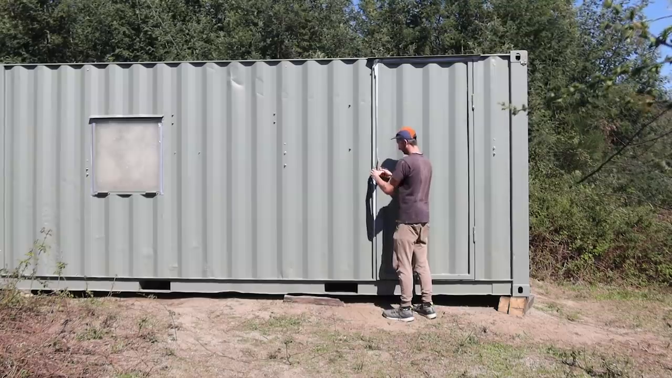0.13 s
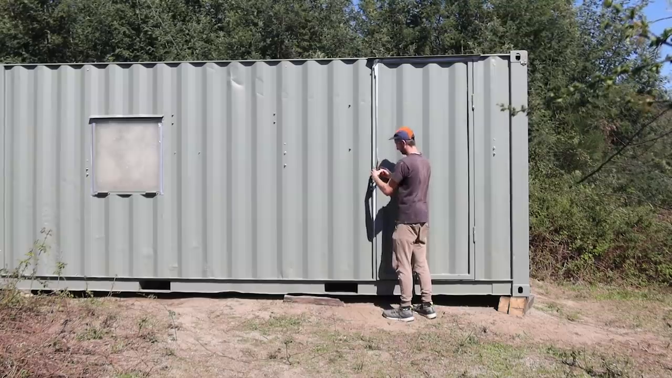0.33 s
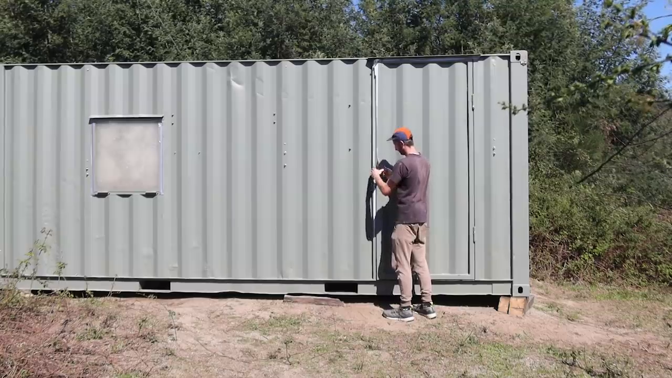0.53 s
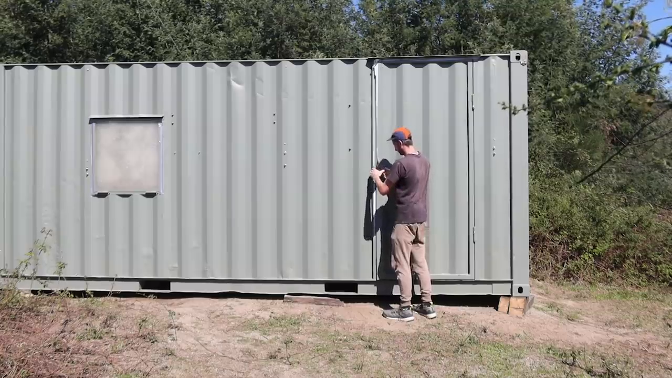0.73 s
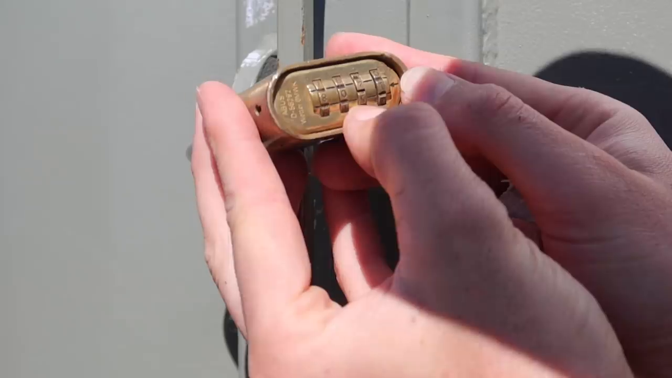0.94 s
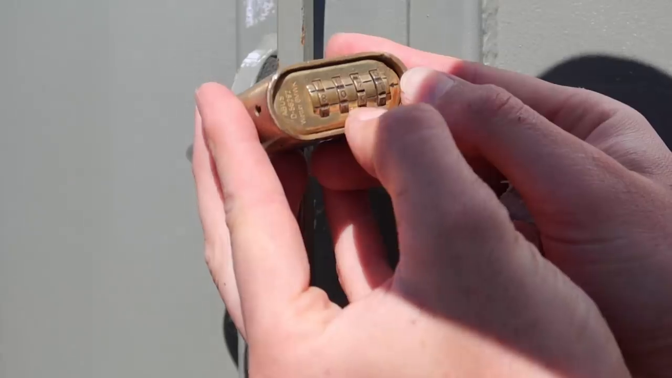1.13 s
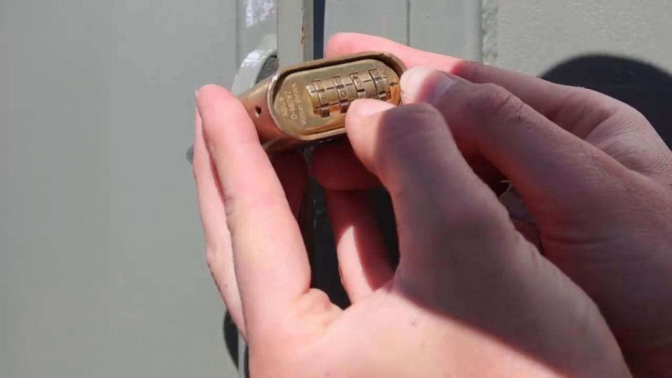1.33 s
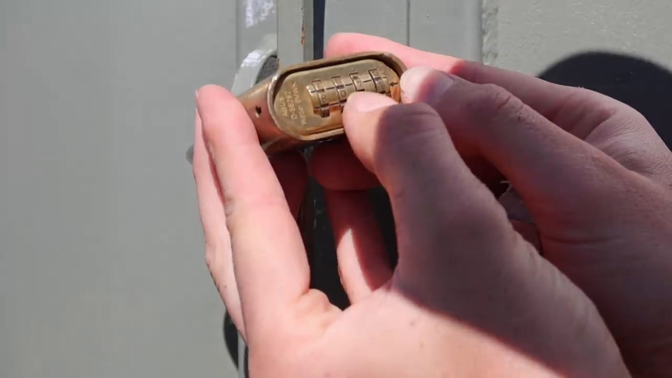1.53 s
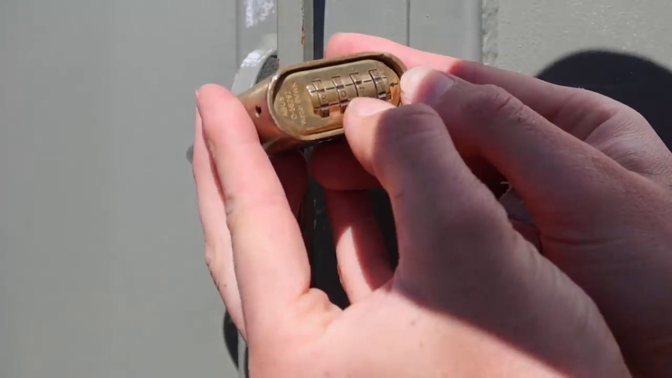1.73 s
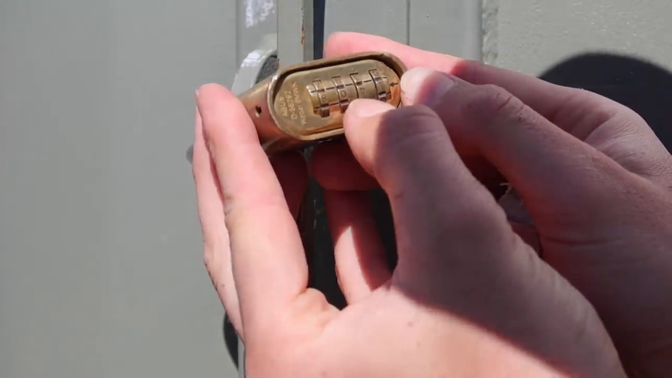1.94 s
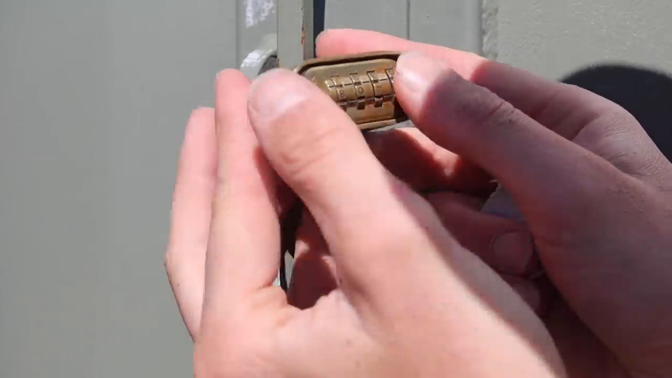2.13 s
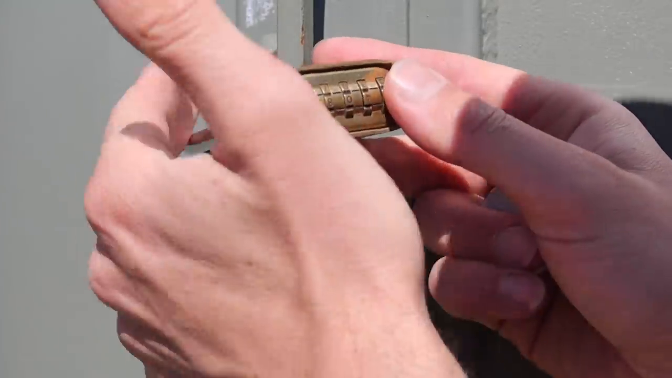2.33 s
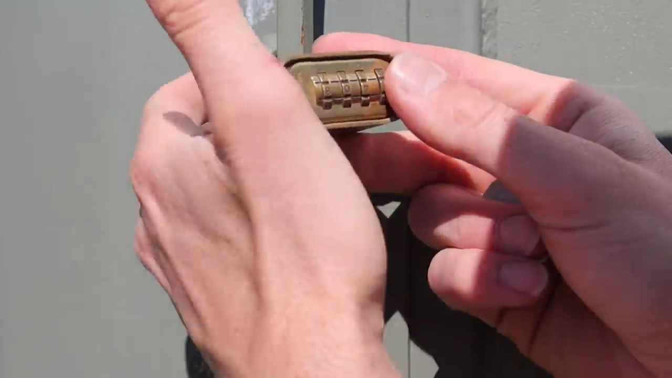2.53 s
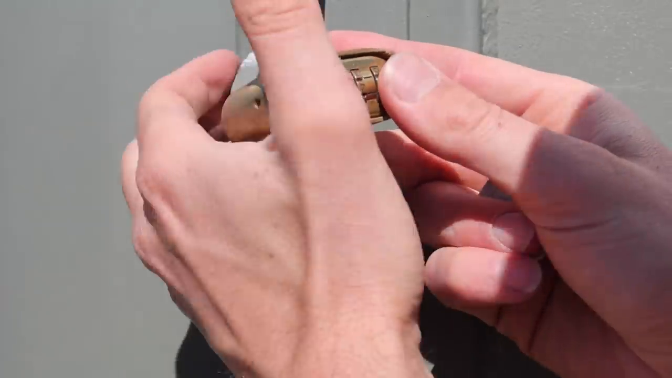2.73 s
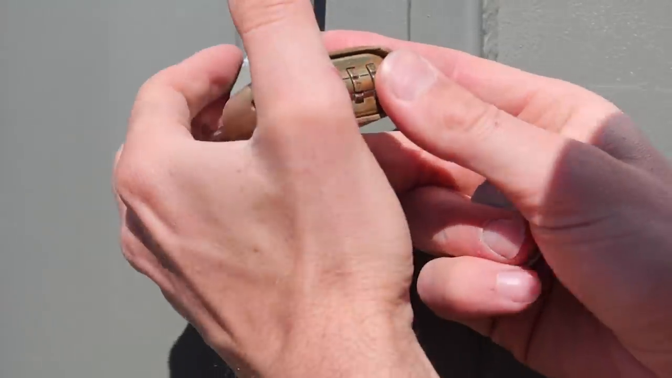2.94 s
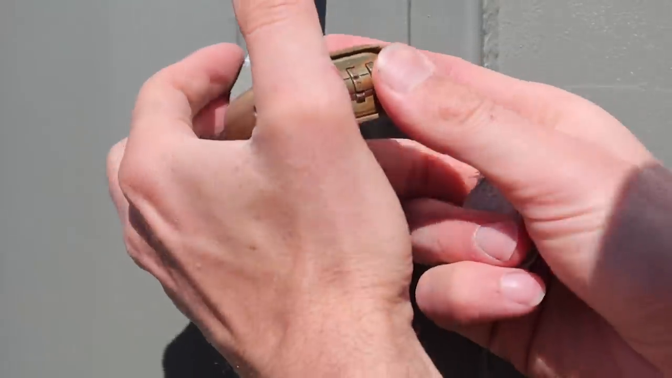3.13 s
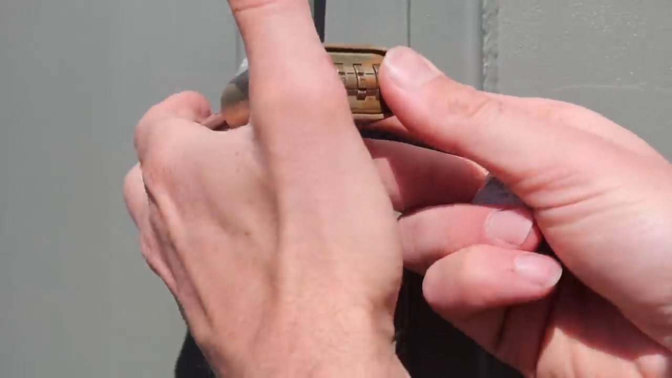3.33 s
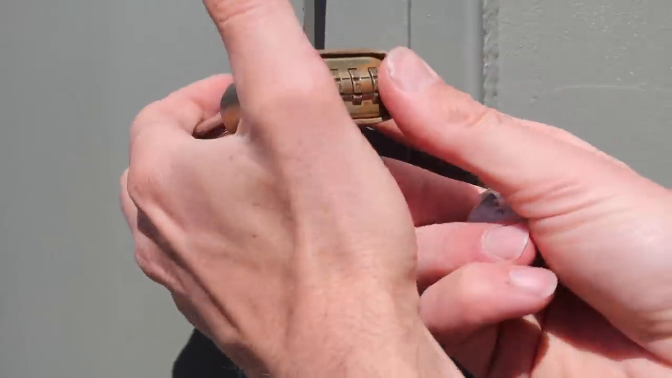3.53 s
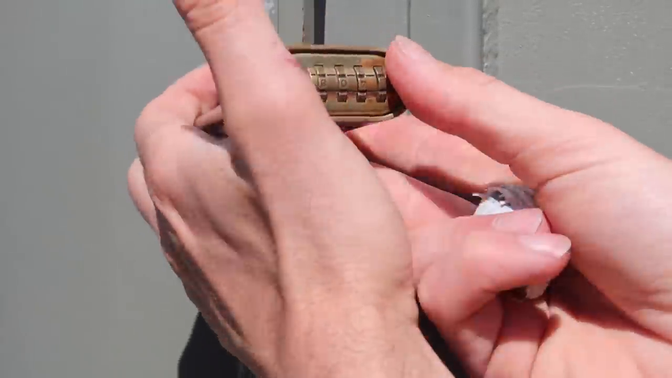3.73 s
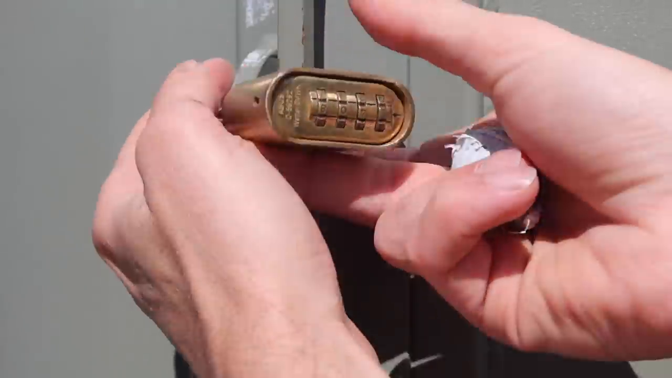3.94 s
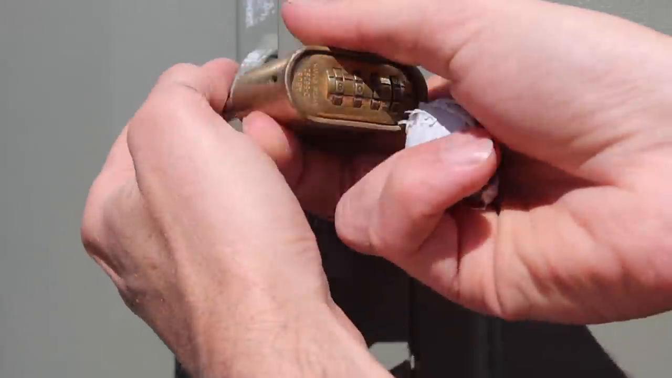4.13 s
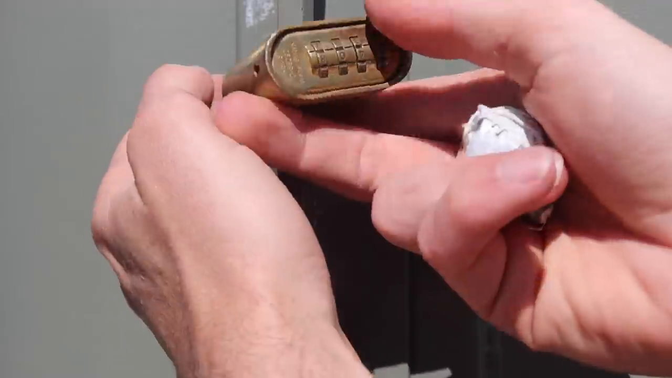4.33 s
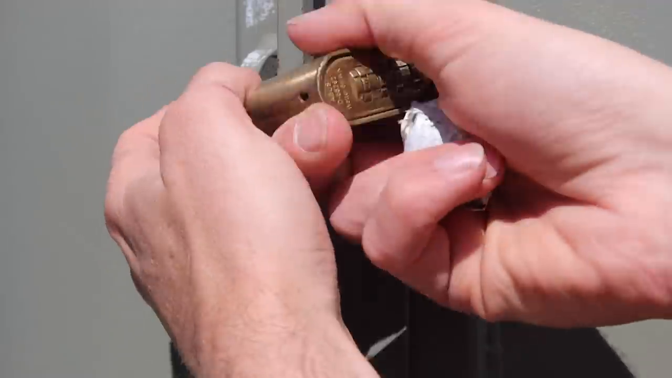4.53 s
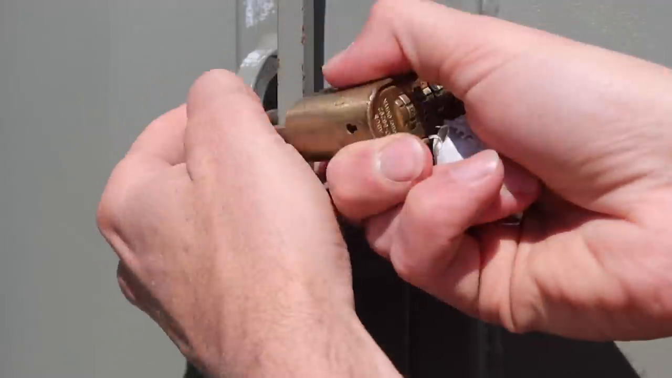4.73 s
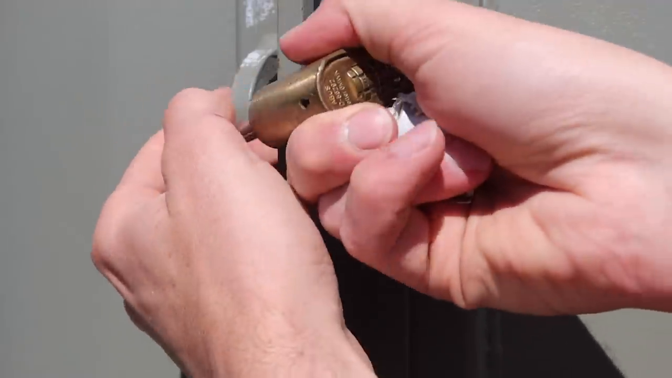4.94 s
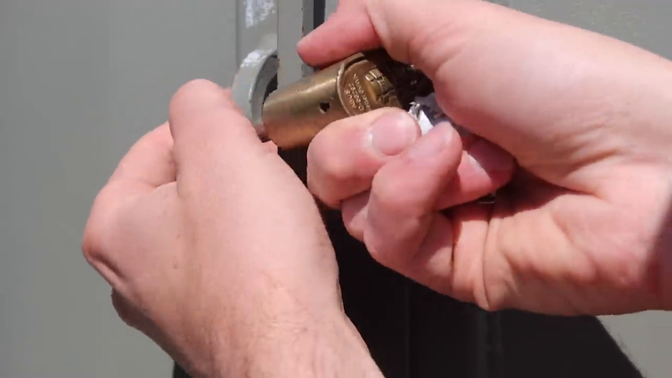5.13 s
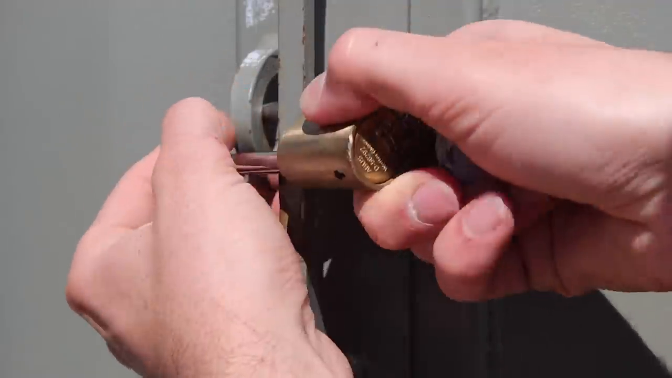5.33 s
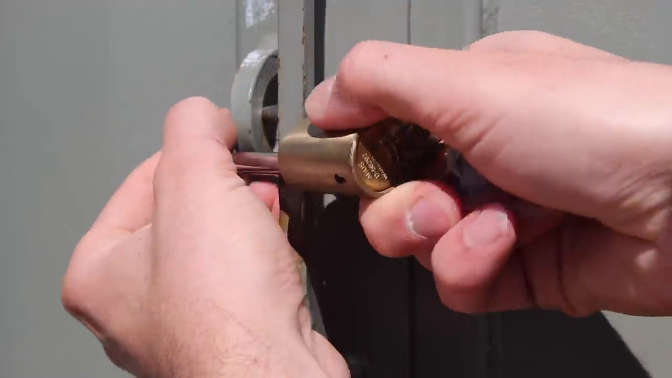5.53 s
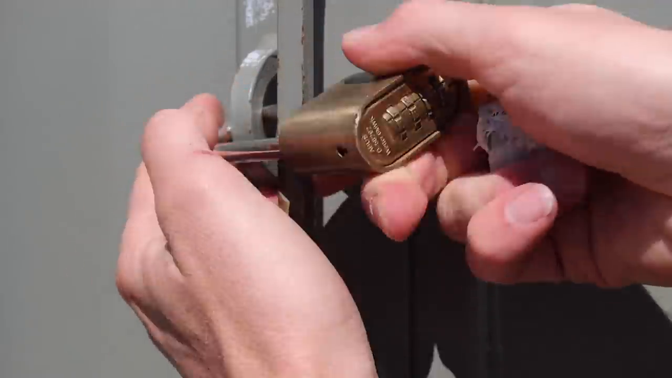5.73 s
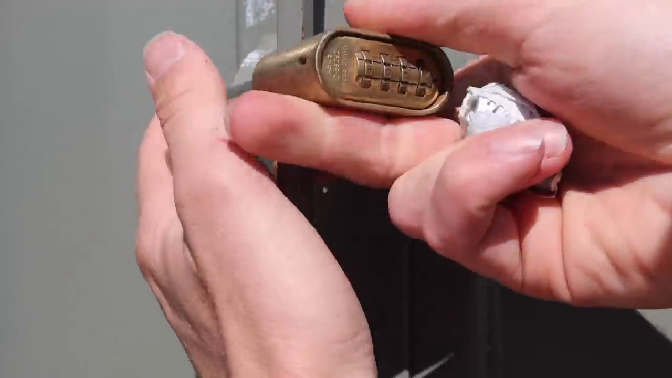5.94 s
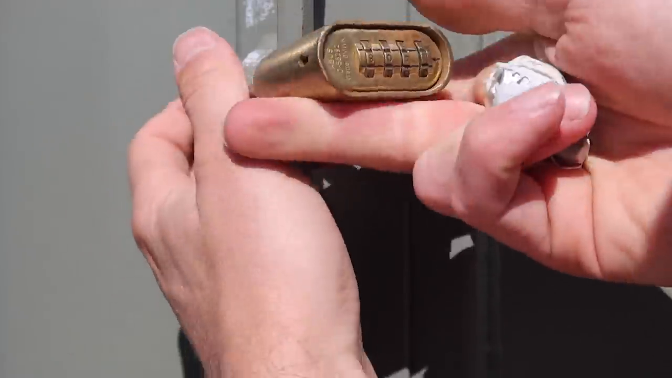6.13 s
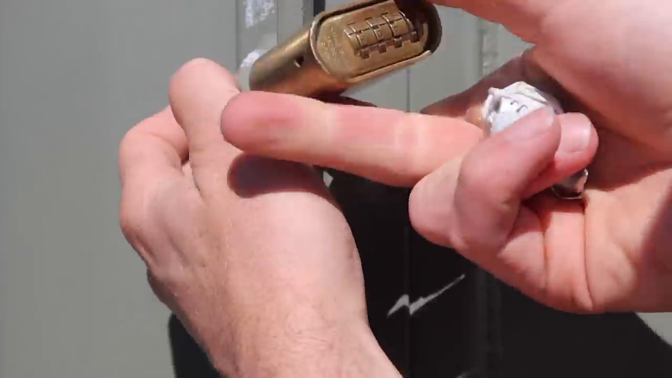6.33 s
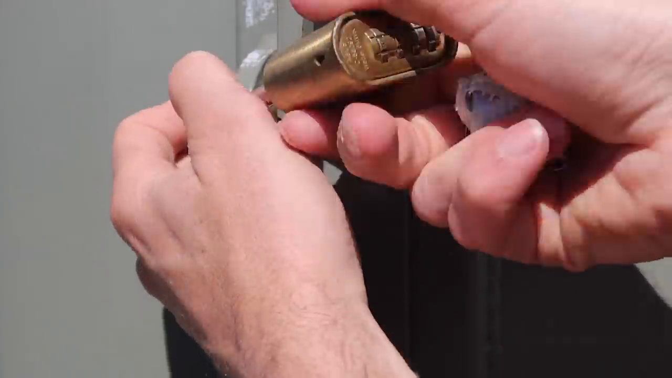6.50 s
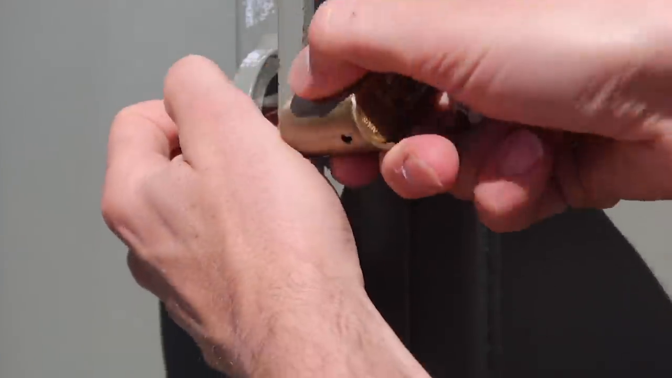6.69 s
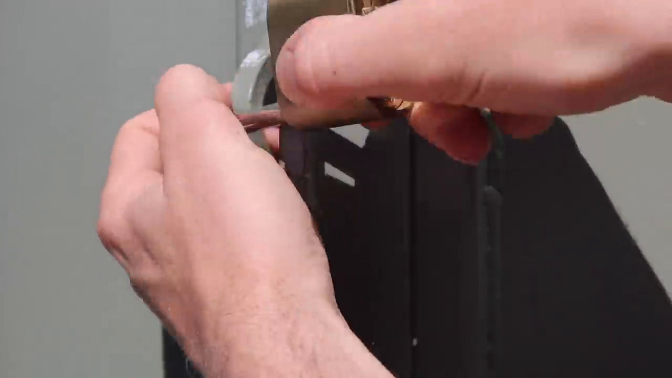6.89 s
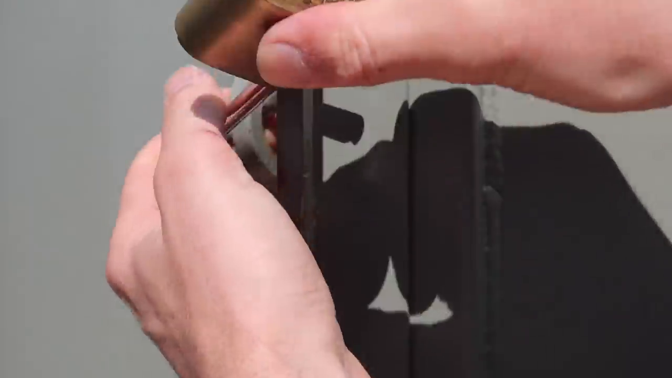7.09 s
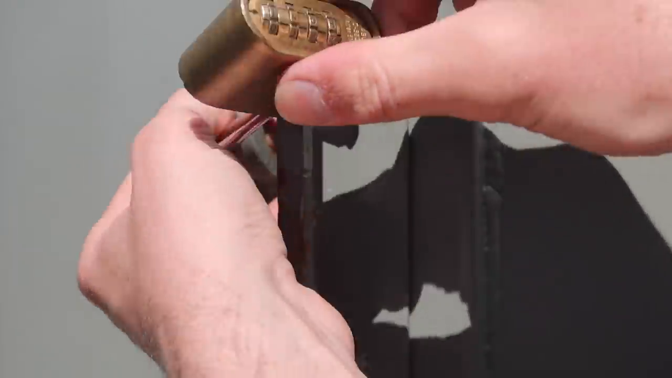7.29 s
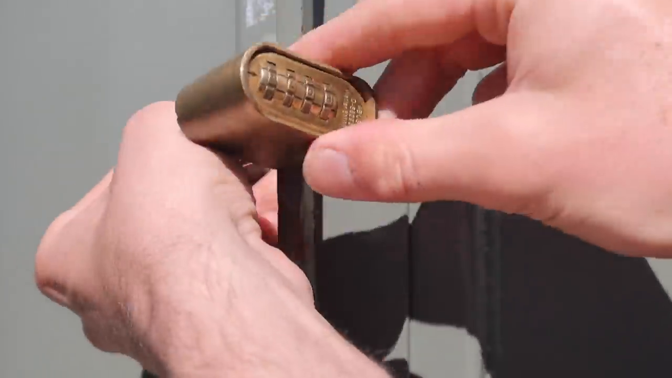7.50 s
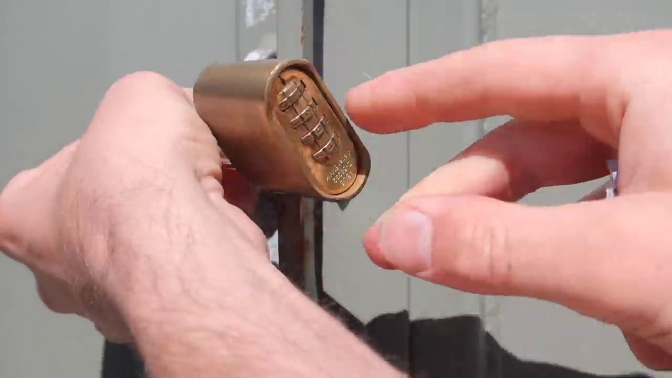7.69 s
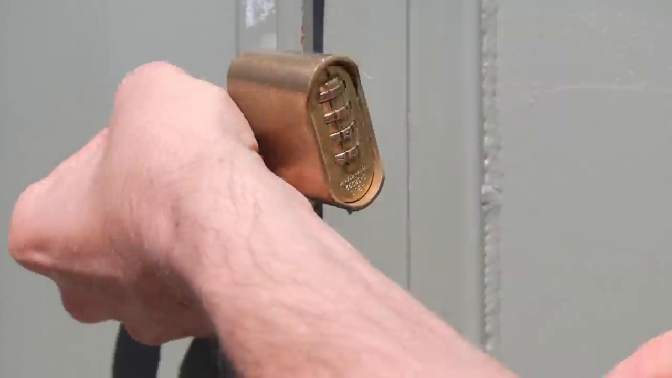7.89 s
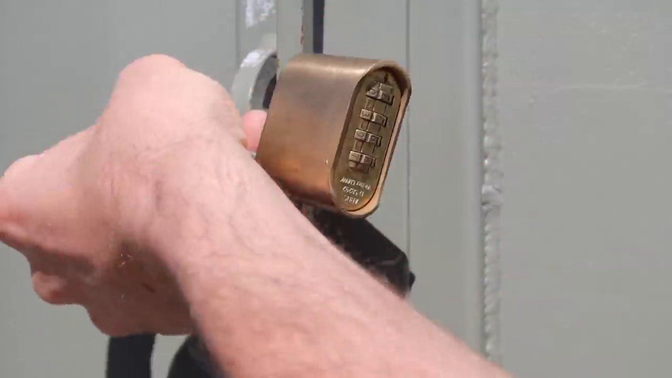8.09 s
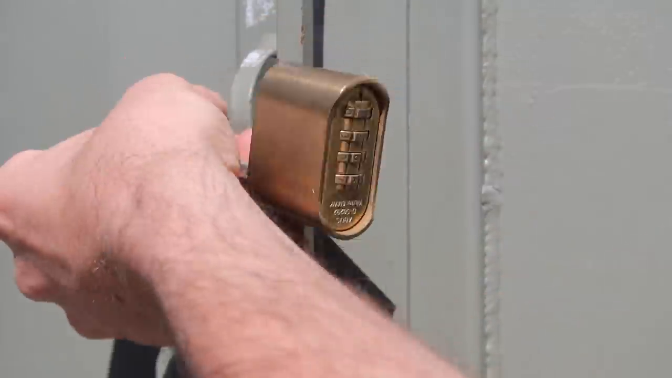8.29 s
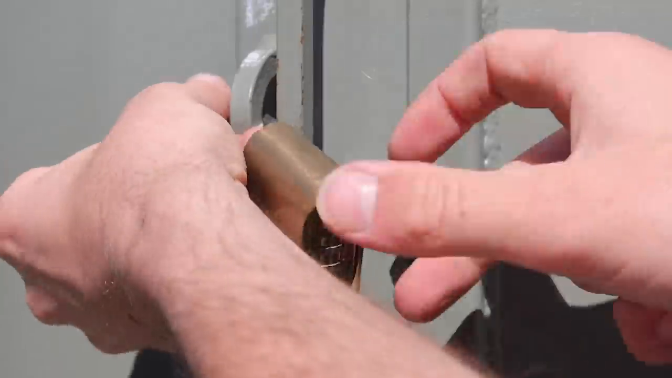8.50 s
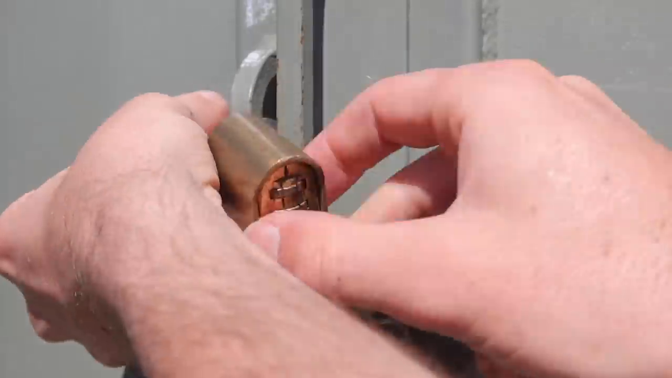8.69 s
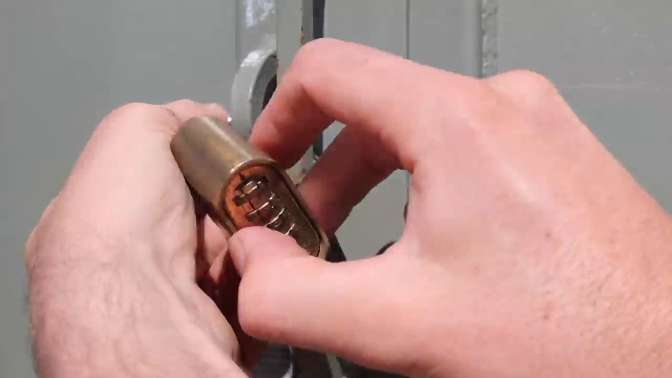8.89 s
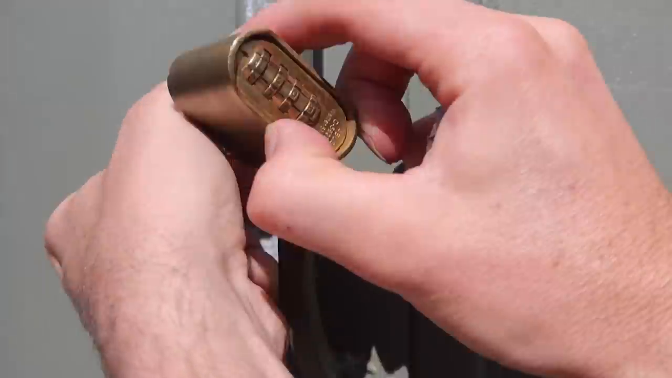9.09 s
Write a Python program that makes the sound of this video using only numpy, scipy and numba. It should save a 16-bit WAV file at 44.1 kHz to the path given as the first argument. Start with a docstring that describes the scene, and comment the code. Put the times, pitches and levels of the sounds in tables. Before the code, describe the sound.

Close outdoor stereo pickup of a padlock being freed from a large metal door. Light clicks come first, then dense clanking with bright metallic cracks, scratchy chatter, a few high shackle pings and low panel hums. Thin bird whistles sit faintly behind. After seven seconds there is a lull with skin rubbing brass, a last cluster of loud clanks, and small sounds to the end.

```python
"""Quiet outdoor air and one far-off bird call, then a brass padlock is worked out of the latch of a steel
shipping container. Each knock of lock or shackle is noise shaped into a crack and a crowded ring, with a boom
of decaying door modes; stick-slip ticks make the shackle's scrapes and the rub of fingers. Clicks are pairs of
modes, pings a few close high modes and slow hums single modes; thin bird whistles are wavering tones, the air
is filtered noise. A close stereo microphone with a limiter picks it up, the latch a little to its right."""
import sys
import numpy as np
from scipy import signal
from scipy.fft import rfft, irfft, next_fast_len
from scipy.io import wavfile
from numba import njit

SR = 44100
rng = np.random.default_rng(int(sys.argv[2]) if len(sys.argv) > 2 else 0)


def materialize(psi):
    """Save the field psi as 16-bit PCM at rate SR to the path in sys.argv[1].

    A 1-D psi becomes a single channel; in a 2-D psi each row is a channel.
    """
    bounded = np.clip(np.atleast_2d(psi).T, -1, 1)
    quanta = np.round(bounded * 32767).astype(np.int16)
    wavfile.write(sys.argv[1], SR, quanta)


N = 403515
T = np.arange(N) / SR
RISE_S = 0.0018  # time constant of the door's build-up after a blow
KNEE_HZ = 1795  # a knock's weight and clank act below this, its hardness above
TOP_HZ = 15200  # upper edge of the microphone's range


def undb(db):
    """Decibels to gain."""
    return 10 ** (np.asarray(db) / 20)


def unit(x):
    """Scale to rms 1."""
    return x / np.sqrt(np.mean(x ** 2))


def add(out, s, x):
    """Mix x into out from time s on."""
    i = max(int(s * SR), 0)
    out[i:i + len(x)] += x[:max(len(out) - i, 0)]


def colour(x, hz, db):
    """Causal filter through (Hz, dB) points, built from the cepstrum of its log gain."""
    size = 4096
    f = np.maximum(np.fft.rfftfreq(size, 1 / SR), 1)
    gain_db = np.interp(np.log(f), np.log(hz), db)
    cepstrum = irfft(np.log(undb(gain_db)))
    # folding the cepstrum onto positive times gives minimum phase
    cepstrum[1:size // 2] *= 2
    cepstrum[size // 2 + 1:] = 0
    impulse = irfft(np.exp(rfft(cepstrum)))
    return signal.oaconvolve(x, impulse)[:len(x)]


def band(x, lo_hz, hi_hz, order=3):
    """Butterworth band-pass."""
    sos = signal.butter(order, [lo_hz, hi_hz], "bandpass", fs=SR, output="sos")
    return signal.sosfilt(sos, x)


def air(air_db=-47):
    """Steady soft outdoor air: filtered noise, wide except in the deep bass, with a few puffs of wind."""
    # spectrum of the open air: (frequency [Hz], relative density [dB per Hz])
    air_spectrum = [(15, -85), (25, 1.5), (104, 4.5), (281, 2), (339, -4), (378, -2), (521, -7.5),
                    (893, -11.5), (1020, -12), (1660, -15.5), (2170, -17), (2620, -19), (4850, -23.5),
                    (13000, -39), (15400, -60)]
    # width of the open air: (frequency [Hz], side minus mid [dB])
    air_width = [(30, -12), (60, -18), (140, -6.5), (350, 1.5), (850, 1), (2000, -1.5), (5000, -3),
                 (12000, -3.5)]
    # puffs of wind on the microphone: (time [s], length [s], level [dB])
    puffs = [(0.43, 0.11, -42), (0.524, 0.18, -37.5), (5.707, 0.25, -36)]
    mid = undb(air_db) * unit(colour(rng.standard_normal(N), *np.transpose(air_spectrum)))
    side = undb(air_db) * unit(colour(rng.standard_normal(N), *np.transpose(air_spectrum)))
    side = colour(side, *np.transpose(air_width))
    for s, length_s, db in puffs:
        n = int(length_s * SR)
        rumble = unit(band(rng.standard_normal(n), 35, 99))
        add(mid, s, undb(db) * np.hanning(n) * rumble)
    return np.array([mid + side, mid - side])


def note(hz, db):
    """A bird's pure tone that swells and fades along a pitch line."""
    envelope = undb(db) * np.sqrt(2 * np.hanning(len(hz)))
    return envelope * np.sin(2 * np.pi * np.cumsum(hz) / SR)


def birds(whistle_s=0.11, glide_hz=100, waver_hz=170, echo_db=-10, echo_s=0.03):
    """Pure tones from the trees: one slurred call, later a string of thin, rising, wavering whistles."""
    # the wavy slur of the call, ending on a level pitch: (time [s], pitch [Hz], level [dB])
    warble = [(0.018, 4280, -64), (0.041, 4400, -52), (0.044, 3400, -60), (0.047, 3920, -49),
              (0.059, 3370, -47), (0.069, 4060, -47), (0.08, 3680, -51), (0.09, 3880, -48),
              (0.095, 4370, -57), (0.112, 4350, -50), (0.128, 4350, -68)]
    # thin high whistles: (time [s], pitch at mid-note [Hz] before waver, level [dB])
    whistles = [(5.16, 7250, -69), (5.42, 7200, -67), (5.71, 7200, -59), (5.92, 7440, -59),
                (6.127, 7600, -62), (6.32, 7340, -70), (7.385, 6800, -64)]
    times, pitch, level = np.transpose(warble)
    slur = np.sin(2 * np.pi * np.cumsum(np.interp(T, times, pitch)) / SR)
    out = np.interp(T, times, undb(level), left=0, right=0) * slur
    # a low soft note opens the call: 3280 Hz for 20 ms
    add(out, 0.02, note(np.full(int(0.02 * SR), 3280), -58))
    n = int(whistle_s * SR)
    glide = glide_hz * np.linspace(-.5, .5, n)
    for s, hz, db in whistles:
        waver = waver_hz * unit(band(rng.standard_normal(SR), 27, 110))[-n:]
        add(out, s, note(hz + glide + waver, db))
    # trunks and leaves blur the calls a little
    t = T[:SR // 5]
    trees = rng.standard_normal(len(t)) * np.exp(-t / echo_s)
    return out + undb(echo_db) * signal.oaconvolve(out, trees / np.linalg.norm(trees))[:N]


def ringing(modes, t, spot_db, grip_share=0.0347):
    """Decaying modes; the struck spot decides how strongly each answers, and the grip pulls its pitch."""
    out = np.zeros(len(t))
    for hz, db, t60 in modes:
        alive = t[t < t60]
        size = undb(db + spot_db * np.clip(rng.standard_normal(), -2, 1))
        pulled_hz = hz * (1 + grip_share * min(hz / 1000, 1) * rng.standard_normal())
        decay = np.exp(-np.log(1000) * alive / t60)
        out[:len(alive)] += size * decay * np.sin(2 * np.pi * (pulled_hz * alive + rng.random()))
    return out


def door_responses(count=16, same_share=0.12, spot_db=4, patchy_db=2.5, door_db=-6, lock_db=-3,
                   crack_rise_s=0.0014, crack_s=0.015):
    """The answer to a blow at several spots of the latch: a crack, a crowded ring and a boom for each."""
    # modes of the steel door: (nominal pitch [Hz], relative level [dB], t60 [s])
    door_modes = [(35.3, -30, 8.1), (58.9, -27, 2), (91.5, -14, 1.68), (109.7, -22, 3.7), (155.7, -38, 1),
                  (190, -13.5, 1.29), (236, -11.5, 1.22), (288, -10.5, 1.17), (325, -37, 0.17),
                  (339, -23.5, 2), (402, -17.5, 1.8), (468, -6, 0.55), (521, -12, 0.71), (627, -25.5, 0.66),
                  (696, -21.5, 0.88), (758, -32.5, 1), (805, -9.5, 0.49), (944, -10, 0.39),
                  (1107, -9.5, 0.26), (1238, -20, 0.72), (1790, -18, 0.3), (1878, -9.5, 0.22),
                  (1710, -7.5, 0.27), (1802, -1, 0.07), (1905, -11, 0.3)]
    # short bright modes of brass body and shackle: (nominal pitch [Hz], relative level [dB], t60 [s])
    lock_modes = [(1356, -23, 0.11), (2787, -9.5, 0.051), (2980, -21, 0.16), (4220, -11, 0.059),
                  (4760, -17.5, 0.1), (5740, -18, 0.031), (6240, -27.5, 0.036), (8100, -21.5, 0.021),
                  (8500, -25.5, 0.04), (9270, -28, 0.027), (10250, -27.5, 0.051), (11540, -29, 0.03)]
    # crowd of overlapping panel modes:
    # (frequency [Hz], relative density [dB per Hz], share that rings on [dB], t60 [s])
    panel = [(85.3, -13.5, 5.5, 0.56), (198, 3, -5.5, 1), (473, 8, -9, 0.76), (920, 3.5, -9, 0.42),
             (990, -9.5, -3, 0.63), (1707, -1, -4.5, 0.42), (2220, -9, -2, 0.37), (3730, -10, -9.5, 0.32),
             (5000, -16, -19, 0.33), (6340, -19.5, -16, 0.077), (10700, -39, -36, 0.033),
             (15000, -84, -26, .08)]
    t = np.arange(next_fast_len(int(1.2 * SR), real=True)) / SR
    hz, db, ring_db, t60 = np.transpose(panel)
    log_f = np.log(np.maximum(np.fft.rfftfreq(len(t), 1 / SR), 1))
    bass_cut = 1 + (hz[0] / 2 / np.exp(log_f)) ** 2
    spectrum = undb(np.interp(log_f, np.log(hz), db)) / bass_cut
    # overlapping frequency slices, each with its own decay
    slices = np.array([np.interp(log_f, np.log(hz), row) for row in np.eye(len(hz))])
    fades = undb(ring_db[:, None] - 60 * t / t60[:, None])
    patches = np.linspace(np.log(200), np.log(15000), 50)
    # bending waves take a few milliseconds to spread over the sheet
    rise, snap = 1 - np.exp(-t / RISE_S), 1 - np.exp(-t / crack_rise_s)
    end_fade = np.minimum(10 * (1 - t / t[-1]), 1)
    common, answers = rng.standard_normal(len(t)), []
    for _ in range(count):
        own = rng.standard_normal(len(t))
        noise = rfft(np.sqrt(same_share) * common + np.sqrt(1 - same_share) * own) * spectrum
        # each spot favours its own groups of modes
        noise *= undb(patchy_db * np.interp(log_f, patches, rng.standard_normal(len(patches))))
        noise /= np.std(irfft(noise))
        crack = irfft(noise, len(t)) * np.exp(-t / crack_s)
        brief = SR // 5
        crack[:brief] += undb(lock_db) * ringing(lock_modes, t[:brief], spot_db)
        ring = (irfft(noise * slices, len(t)) * fades).sum(axis=0)
        boom = undb(door_db) * ringing(door_modes, t, spot_db) * end_fade
        answers.append(np.array([snap * crack, rise * ring, rise * boom]))
    return answers


def tick(db, tick_s=0.0025):
    """The first touch of metal on metal: a very short glint."""
    t = T[:SR // 50]
    hiss = unit(colour(rng.standard_normal(len(t)), [2000, 7000, 15000], [-20, 0, -7]))
    return undb(db) * np.exp(-t / tick_s) * hiss


def swell(hz, db, t60_s, rise_s):
    """One mode that builds up and dies away."""
    t = T[:SR * 2 // 3]
    envelope = (1 - np.exp(-t / rise_s)) * np.exp(-np.log(1000) * t / t60_s)
    return undb(db) * envelope * np.sin(2 * np.pi * hz * t)


def door_note(hz, db, t60_s=0.72, slope=0.63):
    """A door mode that stands out in one knock; high ones die sooner (t60_s holds at 100 Hz)."""
    return swell(hz, db, t60_s * (hz / 100) ** -slope, RISE_S)


def metal_note(hz, db, t60_s=0.13, slope=0.46, partner_ratio=1.2, partner_db=-6, rise_s=0.0006,
               paired_from_hz=1500):
    """The latch rings; its higher modes come in pairs that beat roughly (t60_s holds at KNEE_HZ)."""
    life_s = t60_s * (hz / KNEE_HZ) ** -slope
    out = swell(hz, db, life_s, rise_s)
    if hz > paired_from_hz:
        out += swell(hz * partner_ratio, db + partner_db, life_s, rise_s)
    return out


def knocks(answers, attack_s=0.029, settle_s=1.0, tick_db=-21, deep_share=0.85,
           bounce_s=0.004, bounce_db=-5, count=2, glint_db=-5):
    """Heavy blows push low door modes, hard metal adds treble; each knock has its door and metal note."""
    # knocks of lock and shackle on the latch: (time [s], rms level over attack_s [dB],
    # weight of the push into the door [dB], hollow clank of the hasp [dB],
    # hardness of the contact as treble slope [dB per octave], ring-on at the start [dB],
    # door note [Hz], its level re the knock [dB], metal note [Hz], its level re the knock [dB])
    knock_table = [(0.196, -35, 12, 0, 5, -1, 643, -4, 5570, -11),
                   (0.925, -39.5, 3, -14, -10, -5, 288, 5, 2140, -8),
                   (1.343, -50, 9, -4, -10, -13, 212, -2, 1707, -10),
                   (1.842, -42.5, -4.5, -13, -12.5, -13, 204.5, 4.5, 1670, -1),
                   (2.088, -42, 15, 2, -8, -8, 538, 5, 1690, -12),
                   (2.256, -22, 7, 5.5, -13, -3.5, 756, -9, 1855, -10),
                   (2.502, -41, 10, 13, -15, -3, 610, -5, 1750, -21),
                   (2.551, -19, 3.5, 7.5, -5.5, 4.5, 179, -4, 1920, -9),
                   (2.594, -24.5, 8.5, 6, -11, -6, 468, 1, 4660, -23),
                   (2.656, -26, -7.5, -7, -5.5, -3, 198, 0, 1300, -6),
                   (2.738, -19.5, 16.5, 11, -12, -2, 466, -2, 1179, -16),
                   (2.829, -27.5, 5.5, -7, -6.5, 0, 296, 0.5, 1800, -10),
                   (2.892, -45.5, -15, -11, 9.5, 23, 214, 8, 1755, -5),
                   (2.962, -47.5, 1, -1, 4, 12, 223, 1, 2210, -12),
                   (3.063, -28.5, 10.5, 3, 5, 1.5, 395, -2, 1326, 3),
                   (3.307, -34.5, 3.5, -6, 3.5, 1, 233, -9, 2640, -4),
                   (3.387, -31.5, 7, -11, 2.5, 19.5, 337, -1, 1780, -4),
                   (3.588, -17.5, 2, -6.5, 6, 7, 245, -11, 2640, -6),
                   (3.604, -31, 10, 6, 12, 1, 290, -1, 4600, -10),
                   (3.6545, -18, -6.5, -15, 9, -5, 210, -9, 1630, 0),
                   (3.6655, -18.5, -3.5, -7, 8, -3, 400, -6, 5259, -2),
                   (3.846, -30.5, 4, 2, 8.5, 9, 339, 1, 1660, -4),
                   (3.931, -9.5, -10.5, -7, -0.5, -5.5, 507, -6.5, 1710, -2.5),
                   (4.349, -19, 21.5, 12, -1, 21, 275, -13, 1755, -16),
                   (4.41, -15, 7, 3, -11.5, -0.5, 484, -6, 1930, -9),
                   (4.675, -14, 12.5, 7, -2, 10, 755, -3, 1246, -14),
                   (4.75, -8.5, 4.5, 2.5, 1.5, -31, 565, 0, 4180, -12),
                   (4.76, -18, -7, -1, 6, 1, 560, -14, 5260, -8),
                   (4.7695, -7, -8, -1, 1, -6.5, 850, -1, 3970, -1.5),
                   (4.985, -21.5, -10.5, -5.5, 1, -3.5, 526, -7, 2740, -4),
                   (5.017, -37.5, -5, -5, 5.5, 1, 526, -12, 2700, -6),
                   (5.061, -18, 32.5, 21, 6, -3, 184.8, -1, 1730, -23),
                   (5.258, -35.5, -15, 1, 11, 15, 427, 0, 2980, -6.5),
                   (5.275, -15.5, -22, -7.5, 1, -1, 433, -5.5, 2944, -2),
                   (5.305, -9, 4, -0.5, -0.5, -11, 612, -4, 4300, -20),
                   (5.372, -26, -5, -2, -1, -10, 286.9, 8.5, 1700, -12),
                   (5.671, -30.5, 23, 6, -2, -10, 470, 2, 1720, -13),
                   (5.751, -28, -4.5, -14.5, -2.5, -2, 201, -2, 2330, -1),
                   (5.91, -29, 7, -3.5, -2.5, 4, 522, 0.5, 1707, -0.5),
                   (6.038, -33, 9, 12, 6.5, 15, 284, 1, 1707, -2),
                   (6.132, -17.5, -11.5, -8, -4, 1, 468, -3.5, 1707, 3.5),
                   (6.2, -28.5, -12, -23, 1.5, 5, 498, -4, 1666, 5),
                   (6.281, -30, -1, -0.5, 4.5, 10, 249, -1.5, 2680, -3),
                   (6.348, -27.5, -1, -8.5, 2, 3.5, 510, -3, 2900, -8),
                   (6.394, -23, -9.5, -8.5, -2, -0.5, 510, -4, 1907, 1),
                   (6.574, -29, 4, 5, -10, 13, 504, -2, 1707, -1),
                   (6.62, -20.5, -3.5, -15, 2, 3, 504, -1, 1710, -4),
                   (6.686, -12.5, 7, -3, -7.5, -2, 467, -0.5, 1856, -4),
                   (6.767, -17.5, -3, -4, -4, -6, 548, -7, 1690, -10),
                   (6.785, -12, 4, 2, -4.5, -12, 461, 6, 1860, -19),
                   (6.7905, -6.5, -2, -2, 2, -5.5, 685, -14, 3870, -6.5),
                   (6.919, -22.5, 9, 3, -5, -10, 481, 9, 1707, 1),
                   (6.927, -7.5, -12.5, -10, -0.5, -5, 493, -15, 1733, 4.5),
                   (7.122, -23, 0, 4.5, -1.5, 3.5, 221, -3.5, 5370, -16),
                   (7.397, -45, 17, 25, -20, -6, 210, 7, 4150, -23),
                   (7.465, -36, 10, 13, -13, -8, 216, 11, 1604, -13),
                   (7.477, -35, 8, 10.5, -13, 14.5, 216, 6, 1760, -11),
                   (7.646, -34.5, -10, 0, -4.5, -2, 715, 0, 1700, -6),
                   (7.668, -25.5, 17.5, 8, -11, 14, 940, -0.5, 1820, -19),
                   (8.044, -10, 6, -1, 6.5, -1, 194, -4.5, 4050, -1.5),
                   (8.145, -18, -10.5, 2, -7.5, -5, 743, 2.5, 1120, -1),
                   (8.215, -6.5, -11.5, 0.5, -7, -7.5, 758, 1, 1770, -3),
                   (8.385, -34, -16, -9, -4, -3, 820, -3, 1236, 2),
                   (8.443, -32.5, -4, -10, -6, 3, 667, 4.5, 1915, 1),
                   (8.604, -31.5, 17, 14, -28, 3.5, 624, -1, 1760, -16),
                   (8.852, -24, -8, -10, 1, 4, 243.4, -11, 1710, 2.5)]
    deep_hz, door_push_hz, clank_at_hz, hard_octaves = 93, 304, 866, 2.52
    contact_hz = [deep_hz, door_push_hz, clank_at_hz, KNEE_HZ, KNEE_HZ * 2 ** hard_octaves, TOP_HZ]
    out, attack = np.zeros(N), int(attack_s * SR)
    settle = np.exp(-T[:answers[0].shape[1]] / settle_s)
    for k, row in enumerate(knock_table):
        s, db, weight_db, clank_db, hardness, ring_db, door_hz, door_db, metal_hz, metal_db = row
        crack, ring, boom = answers[k % len(answers)]
        # the ring-on starts at its full dB and drifts towards half of it
        blow = crack + undb(ring_db * (1 + settle) / 2) * (ring + boom)
        # the parts rebound within a few milliseconds and land on neighbouring spots
        delays = np.cumsum(bounce_s * rng.uniform(.5, 1, count))
        for j, delay in enumerate(delays):
            neighbour_crack = answers[(k + j + 1) % len(answers)][0]
            add(blow, delay, undb(bounce_db * (1 + j / 2)) * neighbour_crack)
        blow /= np.std(blow[:attack])
        add(blow, 0, tick(tick_db))
        treble_db = hardness * hard_octaves
        contact_db = [deep_share * weight_db, weight_db, clank_db, 0, treble_db, treble_db + glint_db]
        blow = colour(blow, contact_hz, contact_db)
        blow *= undb(db) / np.std(blow[:attack])
        add(out, s, blow)
        add(out, s, door_note(door_hz, db + door_db))
        add(out, s, metal_note(metal_hz, db + metal_db))
    return out


def stroke(length_s, db, slips_per_s, spread_db, fade_share=0.3):
    """Stick-slip ticks of uneven size that swell and fade over one stroke."""
    slips = (rng.random(SR) < slips_per_s / SR) * rng.choice([-1, 1], SR)
    slips = slips * undb(spread_db * np.clip(rng.standard_normal(SR), -2, 2))
    n = max(int(length_s * SR), SR // 50)
    return undb(db) * slips[:n] / np.std(slips) * signal.windows.tukey(n, fade_share)


def scrapes(answers, count=4, slips_per_s=700, spread_db=4, dip_db=-3, bass_db=-2, ring_db=-6):
    """Stick-slip ticks of the shackle, moving from spot to spot, rung through the door."""
    # shackle sliding or chattering in the hasp: (from [s], to [s], level before colouring [dB],
    # hardness as gain near 3 kHz [dB], further gain near 4 kHz and again at 9 kHz [dB])
    slides = [(0.787, 0.895, -46.5, -13, -7), (2.098, 2.252, -46.5, -12, -4), (2.457, 2.535, -38.5, -7, -1),
              (2.553, 2.607, -31, -6, -7), (2.825, 2.904, -34, -6, -1), (3.392, 3.478, -37, -7, -3),
              (3.508, 3.608, -28.5, -3, -1.5), (4.402, 4.445, -26, -9.5, -1),
              (4.636, 4.678, -25.5, -3.5, -5), (4.753, 4.867, -30, 7, -7), (5.299, 5.4, -29.5, 6.5, -6),
              (5.679, 6.088, -36.5, -10, 1), (6.942, 7.018, -31, -13, -11), (7.47, 7.573, -42, -4, -15),
              (7.539, 7.68, -34, 2, -10), (7.641, 7.842, -39.5, -1, -5), (7.994, 8.045, -28, -10, -3),
              (8.018, 8.052, -22, -10, 2), (8.225, 8.312, -24, 4, -25), (8.288, 8.4, -34, 4, -25),
              (8.468, 8.52, -29.5, -11.5, -3)]
    force = np.zeros(N)
    for start, end, db, hard_db, top_db in slides:
        slips = np.pad(stroke(end - start, db, slips_per_s, spread_db), (0, SR // 50))
        contact_db = [bass_db, 0, dip_db, hard_db, hard_db + top_db, hard_db + 2 * top_db]
        add(force, start, colour(slips, [100, 700, 1300, 2800, 4200, 9000], contact_db))
    # the contact takes a random spot every 256 samples
    spots, out = rng.integers(count, size=N // 256 + 1).repeat(256)[:N], np.zeros(N)
    for k, (crack, ring, boom) in enumerate(answers[:count]):
        door = crack + undb(ring_db) * (ring + boom)
        out += signal.oaconvolve(force * (spots == k), door / np.linalg.norm(door))[:N]
    return out


def wheels(t60_s=0.019, rise_s=0.00075, lower_ratio=0.89, lower_db=-6):
    """A number wheel drops into its notch with a dry two-note click."""
    # number wheels dropping into a notch: (time [s], upper note [Hz], level [dB])
    wheel_clicks = [(0.925, 3000, -43), (2.658, 3030, -24), (2.893, 3150, -30), (2.961, 2660, -33),
                    (3.063, 2900, -30), (7.646, 3150, -35)]
    out = np.zeros(N)
    for s, hz, db in wheel_clicks:
        add(out, s, swell(hz, db, t60_s, rise_s))
        add(out, s, swell(hz * lower_ratio, db + lower_db, t60_s / 2, rise_s))
    return out


def rubs(slips_per_s=1400, spread_db=4):
    """Dry skin catches and slips on the lock body: a fine airy rasp."""
    # fingers rubbing over the brass: (from [s], to [s], level [dB])
    finger_strokes = [(2.547, 2.606, -58), (2.819, 2.924, -61), (7.441, 7.462, -47.5), (7.493, 7.692, -52),
                      (7.678, 7.88, -56.5), (8.45, 8.694, -75), (8.724, 8.84, -67.5), (8.947, 9.16, -68.5)]
    # spectrum of their rasp: (frequency [Hz], relative density [dB per Hz])
    rasp = [(1500, -1), (2500, 15), (3000, 17), (3600, 7), (4000, 27), (4400, 19), (5100, -16), (7300, 7),
            (11000, -35)]
    grain, force = colour(signal.unit_impulse(SR // 20), *np.transpose(rasp)), np.zeros(N)
    for start, end, db in finger_strokes:
        add(force, start, stroke(end - start, db, slips_per_s, spread_db))
    return signal.oaconvolve(force, grain / np.linalg.norm(grain))[:N]


def ticks_and_pings(tick_s=0.0034, rise_s=0.0006):
    """Thin treble ticks of decaying noise and high decaying pings of the shackle."""
    # thin treble ticks, several at the first touch of a knock: (time [s], level [dB])
    thin_ticks = [(2.891, -44), (5.017, -40), (5.061, -33), (5.257, -38), (5.477, -49), (6.044, -44),
                  (8.215, -32), (8.48, -61)]
    # the steel shackle pings when its tip is caught: (time [s], level [dB])
    pings = [(3.588, -22), (3.666, -34), (5.305, -29)]
    # its close high modes: (pitch [Hz], level re the ping [dB], t60 [s])
    ping_modes = [(7860, -4.5, 0.075), (8005, 1, 0.085), (8450, -4, 0.06)]
    out = np.zeros(N)
    for s, db in thin_ticks:
        add(out, s, tick(db, tick_s))
    for s, db in pings:
        for hz, mode_db, t60_s in ping_modes:
            add(out, s, swell(hz, db + mode_db, t60_s, rise_s))
    return out


def flexes(rise_s=0.011):
    """The whole door takes up a hard push slowly and hums."""
    # the door flexes and one deep mode swells: (time [s], pitch [Hz], level [dB], t60 [s])
    pushes = [(3.582, 88.6, -22, 0.54), (3.949, 236, -17, 0.28), (4.419, 90, -20.5, 0.87),
              (4.679, 190, -14.5, 0.51), (5.06, 190, -14, 0.61), (5.306, 291, -16, 0.41),
              (6.799, 288, -17, 0.95), (6.985, 107, -12.5, 0.26)]
    out = np.zeros(N)
    for s, hz, db, t60_s in pushes:
        add(out, s, swell(hz, db, t60_s, rise_s))
    return out


def spread(x, lag_ms=0.024, left_db=-1.28, scatter_db=-24.5, scatter_s=0.013, count=5):
    """Latch a little to the right: left is later and duller; scattered sound differs at the two capsules."""
    lag = np.exp(-2j * np.pi * np.fft.rfftfreq(N, 1 / SR) * lag_ms / 1000)
    late = colour(irfft(rfft(x) * lag, N), [150, 1200, 4000], [0, left_db, left_db / 2])
    t, side = T[:SR // 10], np.zeros(N)
    for k in range(count):
        echoes = rng.standard_normal(len(t)) * np.exp(-t / scatter_s)
        # scatter_db holds at 1 kHz
        echoes = colour(echoes / np.linalg.norm(echoes), [100, 400, 1000, 6000], [-12, -3, 0, 7])
        # the scatter slowly changes between several random echo patterns
        share = np.cos(np.pi * (k + 1) * T / T[-1] * 2 + k) * np.sqrt(2 / count)
        side += undb(scatter_db) * signal.oaconvolve(x * share, echoes)[:N]
    return np.array([late + side, x - side])


def scene():
    """Lock and door close to the microphone, birds far off in the middle, air around."""
    answers = door_responses()
    latch = knocks(answers) + flexes() + wheels() + ticks_and_pings() + scrapes(answers) + rubs()
    return spread(latch) + birds() + air()


@njit
def follow(size, attack, release):
    """Envelope that rises fast and falls slowly."""
    out, e = np.empty(len(size)), 0.
    for i in range(len(size)):
        e += (size[i] - e) * (attack if size[i] > e else release)
        out[i] = e
    return out


def record(dry, limit_db=-4.5, attack_s=0.0013, release_s=0.12):
    """A limiter holds down the loudest sounds, remaining peaks are rounded, and the top is cut."""
    loudest = np.abs(dry).max(axis=0)
    envelope = follow(loudest, 1 / (1 + attack_s * SR), 1 / (1 + release_s * SR))
    held = dry / np.maximum(envelope / undb(limit_db), 1)
    rounded = held / (1 + held ** 8) ** (1 / 8)
    top_cut = signal.ellip(8, .2, 70, TOP_HZ, fs=SR, output="sos")
    return signal.sosfilt(top_cut, rounded)


dry = scene()
out = record(dry)
materialize(out)
```